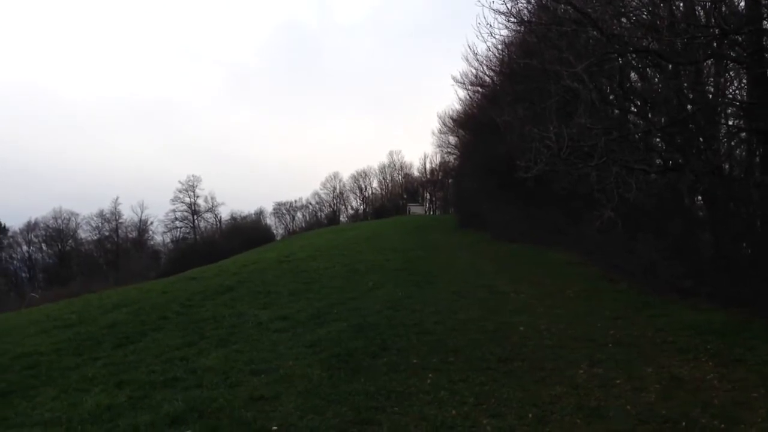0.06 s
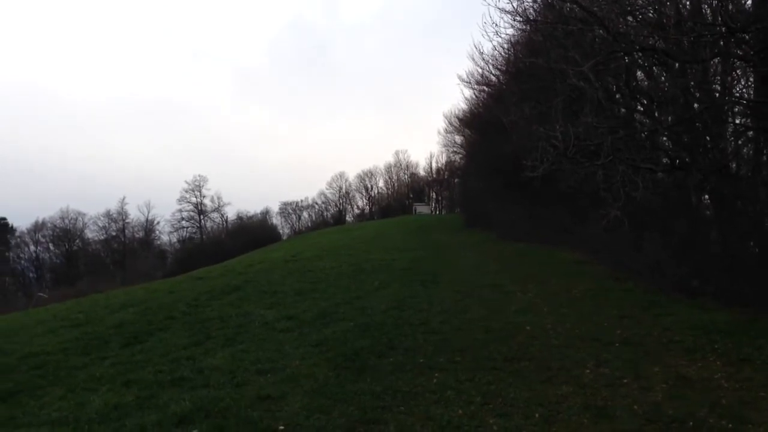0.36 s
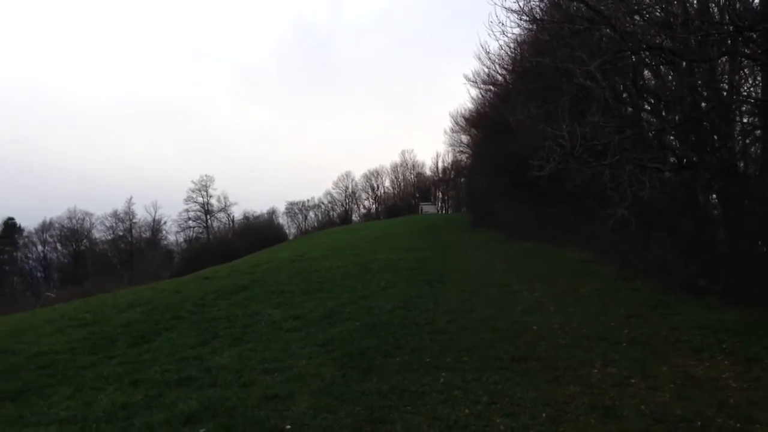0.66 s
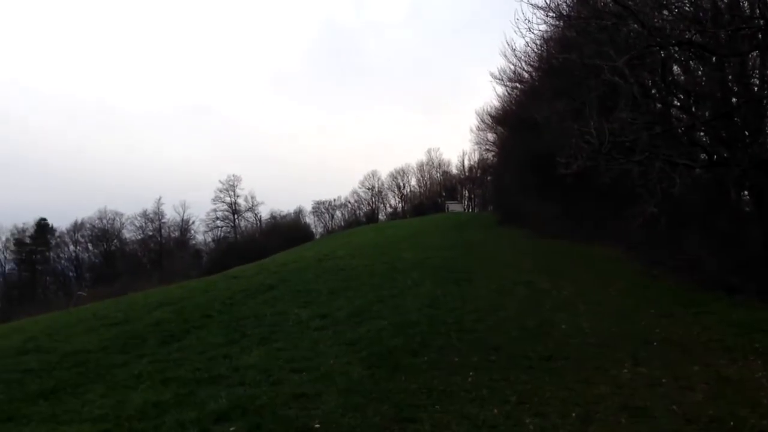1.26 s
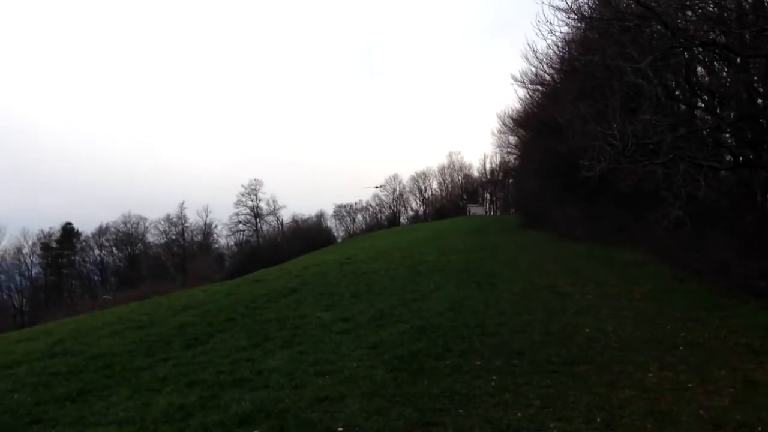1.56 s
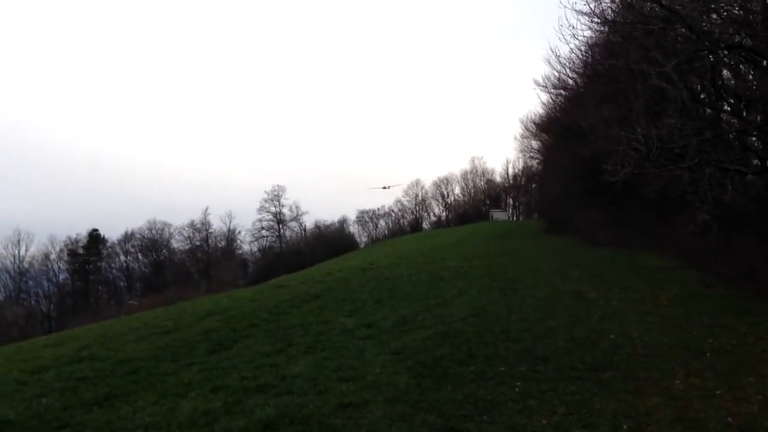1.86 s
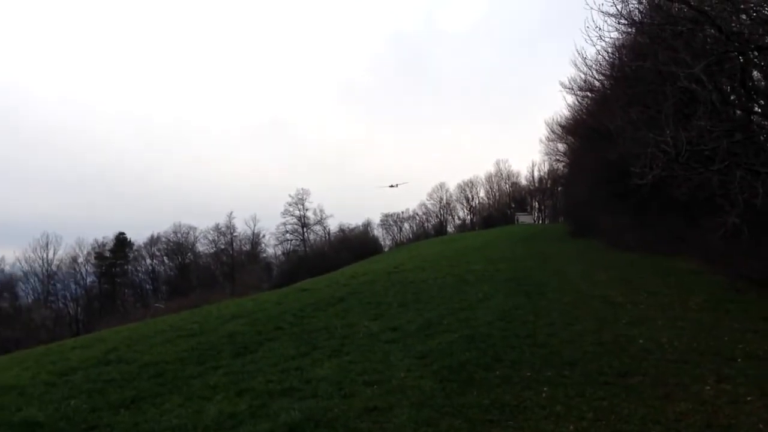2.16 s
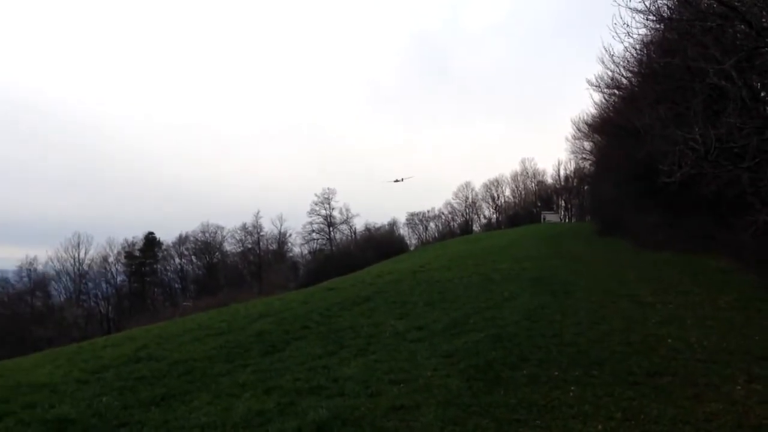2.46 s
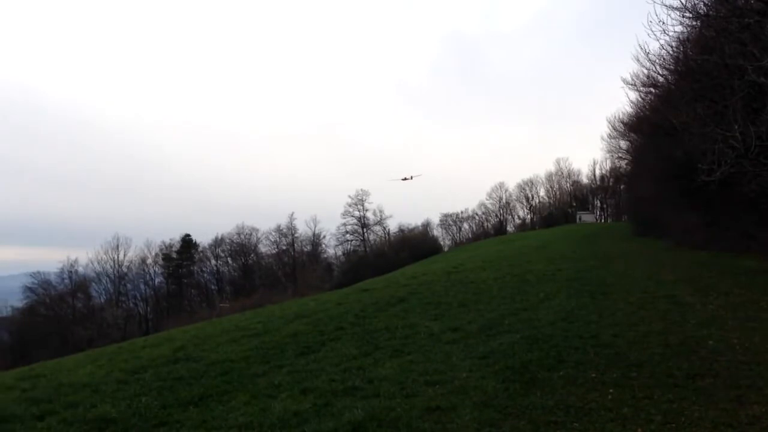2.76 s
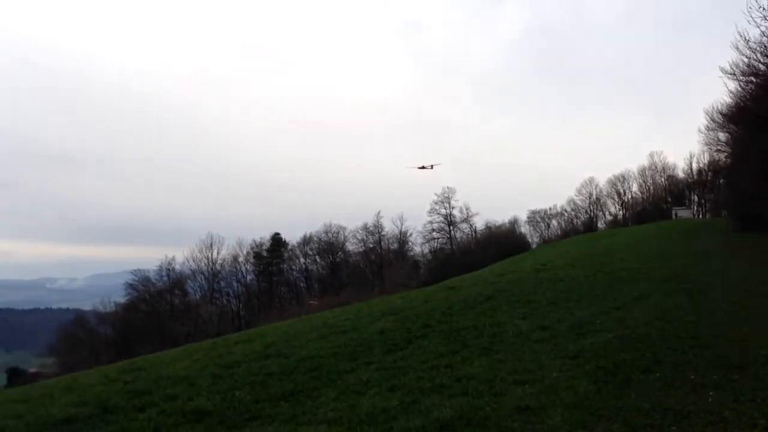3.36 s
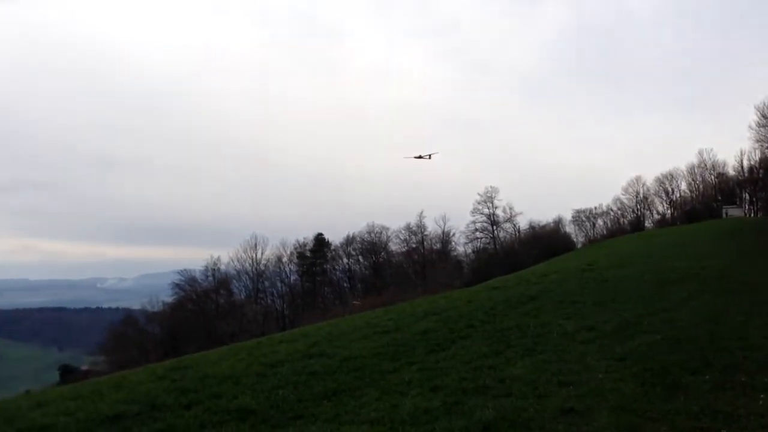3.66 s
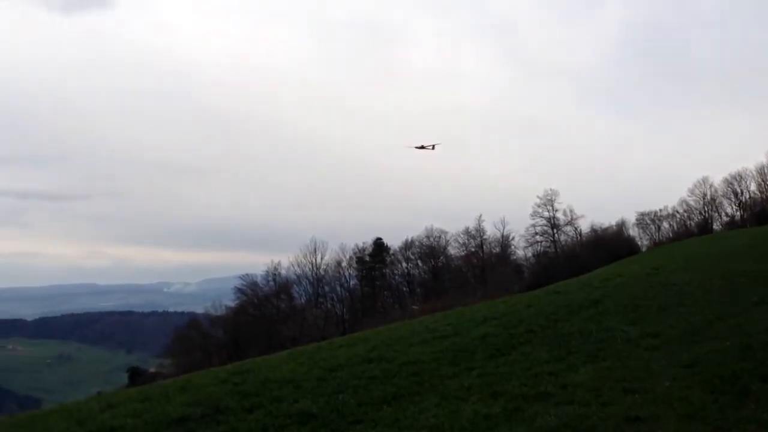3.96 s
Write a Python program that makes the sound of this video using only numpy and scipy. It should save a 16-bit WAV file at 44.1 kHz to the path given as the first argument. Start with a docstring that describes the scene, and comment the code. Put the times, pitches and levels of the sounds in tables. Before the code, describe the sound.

A powered model glider approaches, its faint tone rising into a whistling rush over light wind.

```python
"""A powered model glider comes in low over a meadow. At first its fan idles with a faint tone, while
light wind bumps the microphone and a faint steady whine lies underneath. Just after two seconds the fan
spins up, within a third of a second, to a thin whistle and a loud rush of turbulent air. From then on
the echo off the grass interferes with the rush as a comb filter, whose notches sink as the glider nears."""
import sys
import numpy as np
from scipy import signal
from scipy.fft import rfft, irfft
from scipy.io import wavfile
from scipy.ndimage import map_coordinates

SR = 44100
rng = np.random.default_rng(int(sys.argv[2]) if len(sys.argv) > 2 else 0)


def pcm_store(signal):
    """Save signal as 16-bit PCM."""
    levels = np.round(np.clip(np.atleast_2d(signal), -1, 1) * 32767)
    wavfile.write(sys.argv[1], SR, levels.astype(np.int16).T)


N = 176400
TIME = np.arange(N) / SR

# blade-passing frequency of the fan: time_s, pitch_hz
BLADE_PITCH = [(0, 2195), (.85, 2206), (2.075, 2200), (2.1, 2300), (2.15, 2870), (2.2, 3700), (2.25, 4400),
               (2.3, 5080), (2.35, 5440), (2.42, 5950), (2.48, 6080), (2.9, 6060), (3.5, 6032), (4, 5985)]
# strength of the blade tone: time_s, level_db
BLADE_LEVEL = [(0, -72), (.68, -57.5), (.89, -58), (1.15, -66.5), (1.68, -67), (1.93, -59.5), (2.19, -54.5),
               (2.203, -38.5), (2.38, -47.5), (2.53, -45.5), (2.85, -46), (2.94, -39.5), (3.04, -44.5),
               (3.1, -38), (3.5, -41), (3.68, -45.5), (4, -39.5)]
# flow tearing at the blades, before scaling by fan speed: time_s, level_db
TORN_FLOW_LEVEL = [(2, -110), (2.19, -43), (2.201, -31), (2.27, -31), (2.36, -33), (2.42, -59), (3.8, -50),
                   (3.88, -34.5), (4, -40)]
# turbulent rush in four bands: time_s, roar_db, body_db, rush_db, hiss_db
BAND_LEVELS = [(2, -90, -97, -86, -105), (2.14, -66, -57, -58, -88), (2.2, -59, -49, -51, -70),
               (2.3, -49.5, -41, -37, -50), (2.42, -38.5, -37.5, -33, -46.5), (2.6, -41, -37.5, -31, -46.5),
               (2.7, -41, -38.5, -33, -47.5), (2.84, -40.5, -35, -32, -43.5),
               (2.95, -41.5, -37.5, -30, -35), (3.03, -40, -41, -35, -45), (3.2, -39.5, -39.5, -36, -41.5),
               (3.58, -35.5, -39.5, -37, -40.5), (3.8, -35.5, -39, -37.5, -41.5),
               (3.87, -33, -37, -36, -38), (4, -35, -39, -36, -36.5)]
# spectral shapes of those bands: frequency_hz, density_db
ROAR_SPECTRUM = [(90, -28), (145, 4.5), (230, 1), (390, -1), (520, 2), (720, -6.5), (1150, -4), (1700, -20),
                 (3000, -43)]
BODY_SPECTRUM = [(600, -6), (1100, -4.5), (1600, 8.5), (2050, 5), (2500, 5), (2850, -3), (3400, -14),
                 (5000, -47)]
RUSH_SPECTRUM = [(2000, -34), (2800, -9), (3300, 2.5), (4400, 0.5), (5200, -1.5), (6300, -18), (7200, -31),
                 (10000, -42)]
HISS_SPECTRUM = [(3000, -54), (5000, 2.5), (6500, 3.5), (7600, -1), (8800, -4.5), (9900, -6),
                 (11000, -16.5), (15500, -29.5)]
# brief surges of the hiss: time_s, boost_db
HISS_SURGES = [(2.6, 3), (3.36, 5), (3.46, 3)]
# delay of the ground reflection behind the direct sound: time_s, lag_ms
REFLECTION_LAG = [(2.1, .66), (2.4, .74), (2.6, .795), (3, .865), (3.4, 1.0), (3.6, 1.12), (4, 1.35)]
# airflow over the wings: time_s, level_db
WING_LEVEL = [(0, -68), (.6, -68), (.9, -61.5), (1.3, -57), (1.8, -60), (2.3, -61.5)]
# its spectral shape: frequency_hz, density_db
WING_SPECTRUM = [(300, -31), (650, -0.5), (1080, 0), (1300, 2.5), (1900, -4), (2300, -3), (2650, -14),
                 (3500, -7), (4400, -8), (5600, -19), (9000, -24)]
# wind rumble on the microphone: time_s, level_db
RUMBLE_LEVEL = [(0, -71), (.3, -42), (.5, -54), (.66, -44.5), (.92, -62), (1.25, -60.5), (1.48, -46),
                (1.64, -47.5), (1.8, -44), (2.4, -40), (2.72, -43.5), (3.04, -41), (3.16, -70), (3.47, -44),
                (3.65, -70)]
# its spectral shape: frequency_hz, density_db
RUMBLE_SPECTRUM = [(35, -20), (55, 4), (100, 0.5), (170, -7), (280, -19), (600, -60)]
# single eddies striking the microphone: centre_s, peak_db, pitch_hz
EDDIES = [(0.16, -39, 120), (0.272, -28, 164), (0.305, -36, 100), (.334, -21, 154), (.355, -35, 220),
          (.567, -41, 115), (.677, -28.5, 161), (1.09, -36.5, 135), (1.31, -39.5, 108), (1.464, -32.5, 107),
          (1.545, -34, 100), (1.73, -18, 138), (1.962, -34, 85), (2.026, -35.5, 110), (2.072, -31.5, 133),
          (2.194, -23.5, 85), (2.312, -21.5, 94), (2.39, -29, 95), (2.414, -26, 122), (2.5, -21, 163),
          (2.512, -16.5, 121), (2.852, -25.5, 159), (2.885, -19.5, 111), (2.938, -25, 167),
          (2.98, -23, 125), (3.081, -18.5, 133), (3.44, -30, 138), (3.495, -24, 145)]
# partials of the whine: pitch_hz, level_db
WHINE_PARTIALS = [(1285, -75), (1502, -75.5), (1803, -65), (2104, -65), (2406, -75), (3004, -74.5),
                  (3305, -74.5)]
# slow growth of all those partials: time_s, gain_db
WHINE_GAIN = [(0, -4), (2.2, 3)]
# spectral shape of the background air: frequency_hz, density_db
AIR_SPECTRUM = [(25, 1.5), (60, 10.5), (150, -1), (300, 0), (600, -7.5), (1200, -17), (2700, -14.5),
                (4000, -14.5), (8000, -17.5), (15000, -21)]


def fan_whistle():
    """Periodic blade passage radiates a tone; flow tearing at the blades adds noise bands around it."""
    pitch_hz, = in_time(BLADE_PITCH)
    level_db, = in_time(BLADE_LEVEL)
    torn_db, = in_time(TORN_FLOW_LEVEL)
    flutter_db, full_speed_waver_hz = 2.6, 14
    speed = pitch_hz / pitch_hz.max()
    phase = turning(pitch_hz + full_speed_waver_hz * speed * drift(52))
    tone = rms_one(np.sin(phase) * from_db(flutter_db * drift(24)))
    octave_db = -60 - 26 * (TIME[-1] - TIME)  # the octave carries only from near by, so it grows
    octave = from_db(octave_db) * noise_band(2 * phase, half_width_hz=55)
    upper_whistle = from_db(-7) * speed ** 2 * noise_band(1.052 * phase, half_width_hz=120)
    under_tone = 0.96 * phase
    torn_flow = from_db(torn_db) * speed * noise_band(under_tone, half_width_hz=300)
    idle_rasp = from_db(-5.5) * (1 - speed) * noise_band(under_tone, half_width_hz=170)
    return from_db(level_db) * (tone + idle_rasp + upper_whistle) + octave + ground_reflection(torn_flow)


def air_rush():
    """Turbulence behind fan and wings radiates broadband noise, which flutters as it crosses the wind."""
    spectra = ROAR_SPECTRUM, BODY_SPECTRUM, RUSH_SPECTRUM, HISS_SPECTRUM
    shared_flutter_db = 0.52 * drift(34)
    roar, body, rush, hiss = [from_db(db + shared_flutter_db + 0.97 * drift(15.8)) * noise(spectrum)
                              for db, spectrum in zip(in_time(BAND_LEVELS), spectra)]
    surge_s = 0.027
    surge_db = sum(db * np.exp(-((TIME - time_s) / surge_s) ** 2) for time_s, db in HISS_SURGES)
    return roar + body + rush + hiss * from_db(surge_db)


def ground_reflection(direct):
    """Two-path interference: a delayed echo cuts a comb of notches, which sink as the delay grows."""
    lag_ms, = in_time(REFLECTION_LAG)
    echo_gain, low_hz, dull_hz = 0.74, 460, 6140
    turn_rad = 1.8  # soft grass turns the phase
    hz = np.arange(N // 2 + 1) * SR / N
    midrange = hz ** 2 / (hz ** 2 + low_hz ** 2) / (1 + (hz / dull_hz) ** 4)
    echo = irfft(rfft(direct) * midrange * np.exp(-1j * turn_rad), N)
    delayed = map_coordinates(echo, [(TIME - lag_ms / 1000) * SR], order=3)
    return (direct + echo_gain * delayed) / np.sqrt(1 + echo_gain ** 2)


def wing_noise():
    """Flow over the airframe radiates aerodynamic noise: a far, hollow whoosh and a brief sinking swish."""
    level_db, = in_time(WING_LEVEL)
    centre_s, swell_s, swish_hz, sag_hz_per_s = 1.74, 0.19, 4420, 780
    since_s = TIME - centre_s
    phase = turning(swish_hz - sag_hz_per_s * since_s)
    swish = np.exp(-(since_s / swell_s) ** 2) * noise_band(phase, half_width_hz=190)
    return from_db(level_db) * noise(WING_SPECTRUM) + from_db(-65.5) * swish


def microphone_wind():
    """Turbulent pressure on the microphone makes a lumpy rumble; single eddies push it for a few cycles."""
    level_db, = in_time(RUMBLE_LEVEL)
    lumps_db = 7.5 * np.tanh(drift(20.3))
    pressure = from_db(level_db) * rms_one(noise(RUMBLE_SPECTRUM) * from_db(lumps_db))
    for centre_s, peak_db, pitch_hz in EDDIES:
        cycles = (TIME - centre_s) * pitch_hz
        length_cycles = 0.41 * from_db(0.44 * (-20 - peak_db))  # weaker eddies linger longer
        swell = 1 / np.cosh(np.clip(2 * cycles / length_cycles, -20, 20))
        pressure += from_db(peak_db) * swell * np.sin(2 * np.pi * (cycles + rng.random()))
    return signal.sosfilt(signal.butter(2, 38, "high", fs=SR, output="sos"), pressure)


def whine():
    """Superposed faint partials, each with slight random frequency and amplitude modulation."""
    gain_db, = in_time(WHINE_GAIN)
    waver_hz, flutter_db = 2.86, 2.5
    total = np.zeros(N)
    for pitch_hz, level_db in WHINE_PARTIALS:
        partial = np.sin(turning(pitch_hz + waver_hz * drift(13.7)))
        total += from_db(level_db + gain_db) * rms_one(partial * from_db(flutter_db * drift(17)))
    return total


def background_air():
    """Stationary broadband noise, strongest in the bass, sets the ambient floor."""
    return from_db(-55) * noise(AIR_SPECTRUM)


def noise(spectrum):
    """Spectral shaping of white noise, rolled off beyond the ends of the table; rms 1."""
    hz, db = np.transpose(spectrum)
    bin_hz = np.maximum(np.arange(N // 2 + 1) * SR / N, 1)
    shape = from_db(np.interp(np.log(bin_hz), np.log(hz), db))
    roll_off = np.minimum(1, np.minimum(bin_hz / hz[0], hz[-1] / bin_hz)) ** 2
    return rms_one(irfft(rfft(rng.standard_normal(N)) * roll_off * shape, N))


def noise_band(phase, half_width_hz):
    """Quadrature modulation centres a narrow band of noise on a carrier; rms 1."""
    lowpass = signal.butter(3, half_width_hz, fs=SR, output="sos")
    in_phase, quadrature = signal.sosfilt(lowpass, rng.standard_normal((2, N)))
    return rms_one(in_phase * np.cos(phase) + quadrature * np.sin(phase))


def drift(rate_hz):
    """Low-passed noise gives a random fluctuation up to the given rate; rms 1."""
    lowpass = signal.butter(2, rate_hz, fs=SR, output="sos")
    return rms_one(signal.sosfilt(lowpass, rng.standard_normal(N + SR))[SR:])


def turning(hz):
    """Phase is the time integral of frequency."""
    return 2 * np.pi * np.cumsum(hz) / SR


def in_time(rows):
    """Linear interpolation of each column at every sample."""
    time_s, *columns = np.transpose(rows)
    return [np.interp(TIME, time_s, column) for column in columns]


def from_db(db):
    """Decibels to amplitude ratio."""
    return 10 ** (np.asarray(db) / 20)


def rms_one(x):
    """Normalisation to rms 1."""
    return x / np.sqrt(np.mean(np.abs(x) ** 2) + 1e-20)


def scene():
    """Linear superposition of glider, wind and background, alike in both channels."""
    glider = fan_whistle() + ground_reflection(air_rush()) + wing_noise()
    mono = glider + whine() + microphone_wind() + background_air()
    return np.array([mono, mono])


def record(dry):
    """Band limiting: a steep elliptic low-pass removes the highest treble."""
    cutoff_hz = 15700
    return signal.sosfilt(signal.ellip(10, .1, 80, cutoff_hz, fs=SR, output="sos"), dry)


dry = scene()
out = record(dry)
pcm_store(out)
```